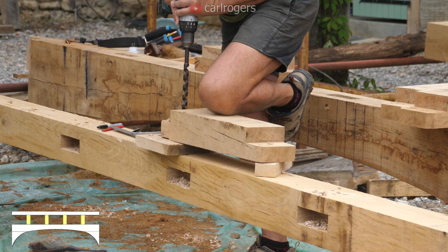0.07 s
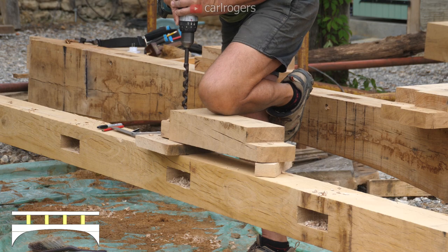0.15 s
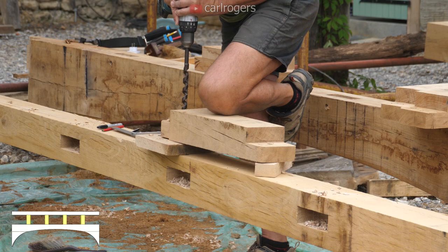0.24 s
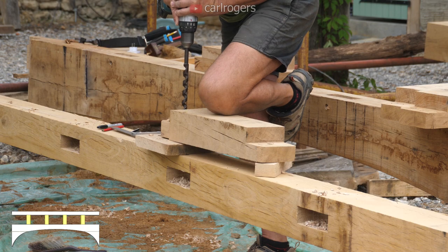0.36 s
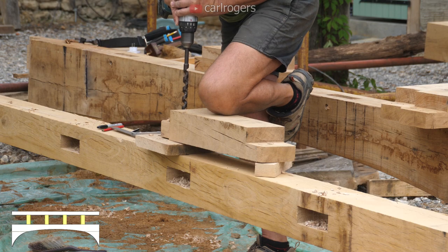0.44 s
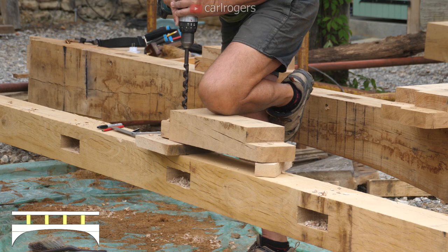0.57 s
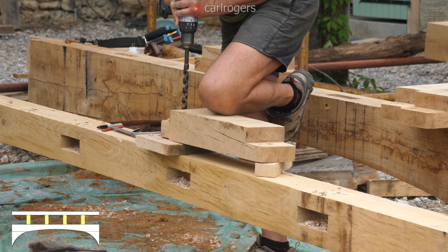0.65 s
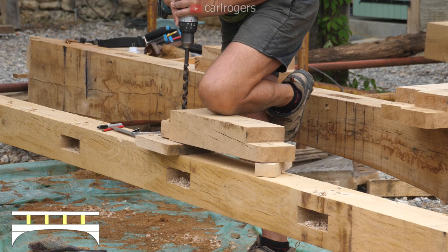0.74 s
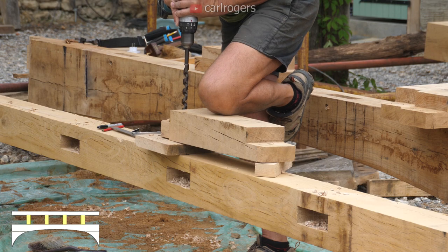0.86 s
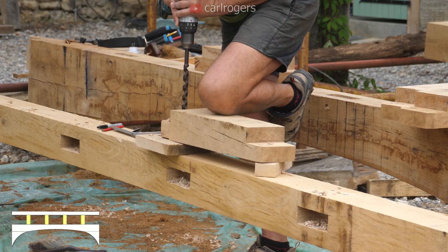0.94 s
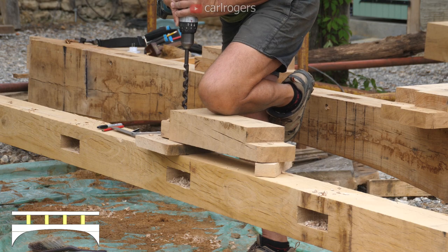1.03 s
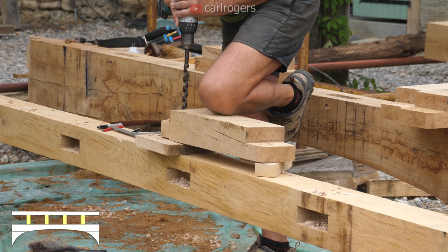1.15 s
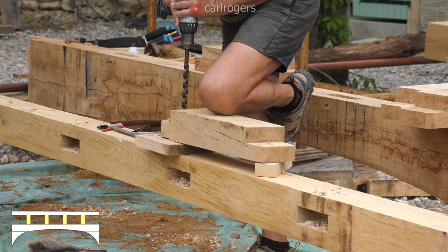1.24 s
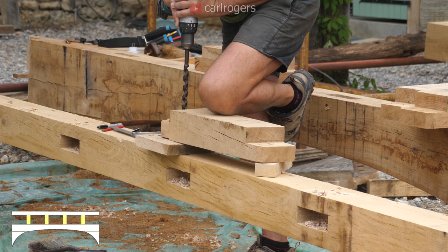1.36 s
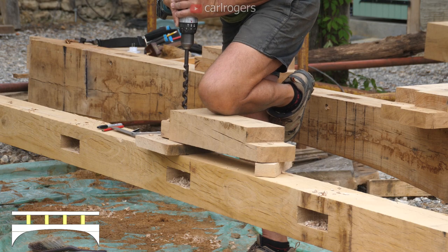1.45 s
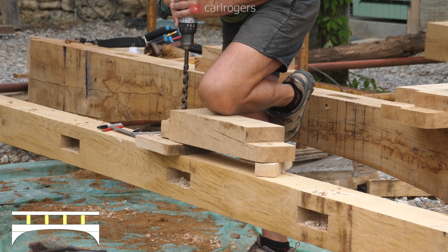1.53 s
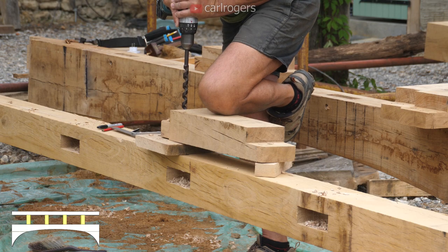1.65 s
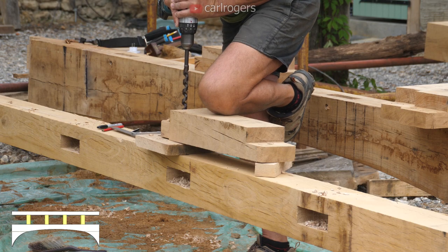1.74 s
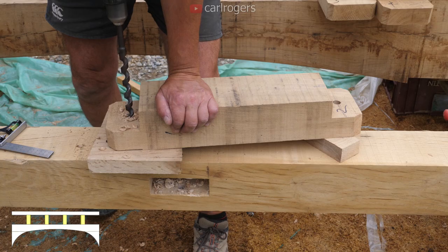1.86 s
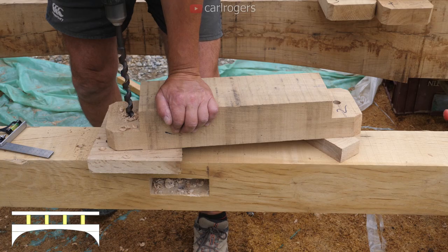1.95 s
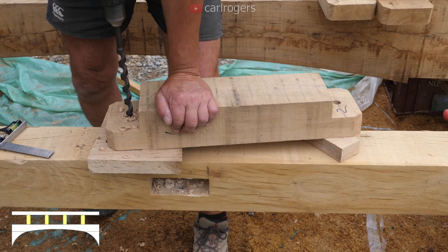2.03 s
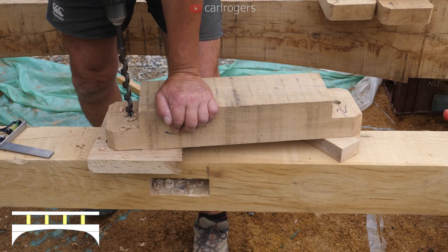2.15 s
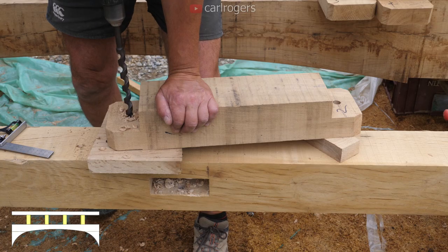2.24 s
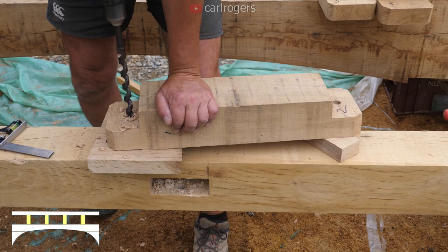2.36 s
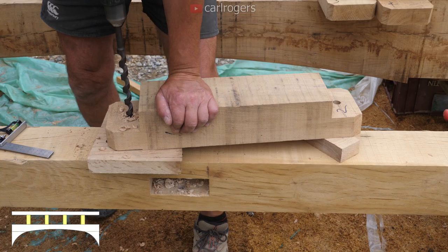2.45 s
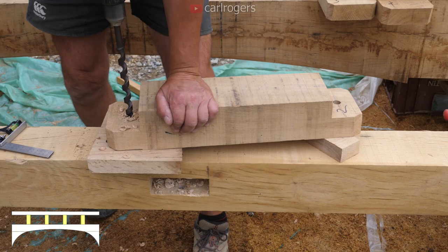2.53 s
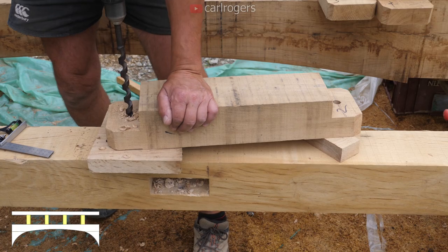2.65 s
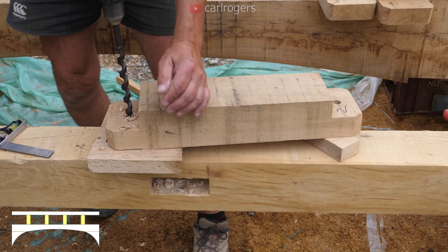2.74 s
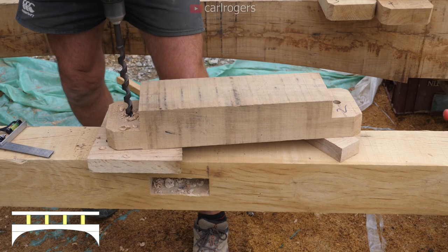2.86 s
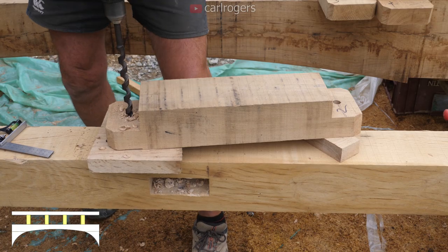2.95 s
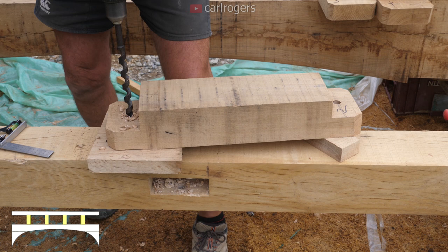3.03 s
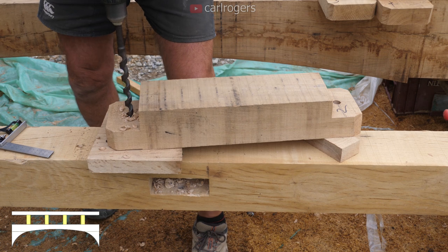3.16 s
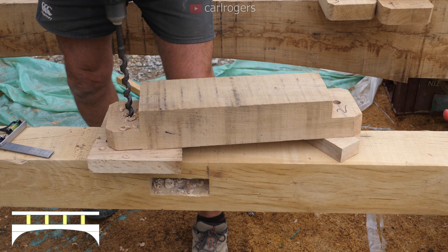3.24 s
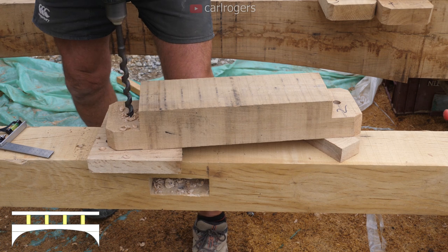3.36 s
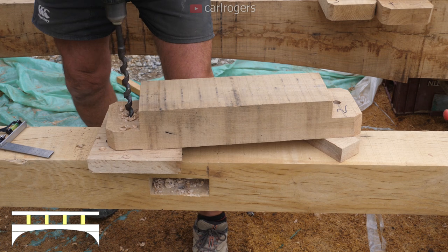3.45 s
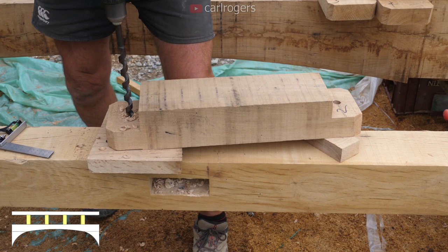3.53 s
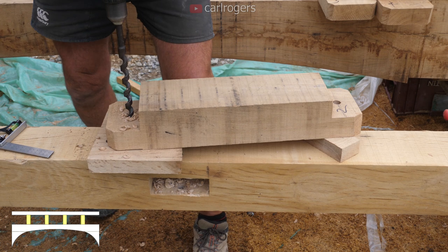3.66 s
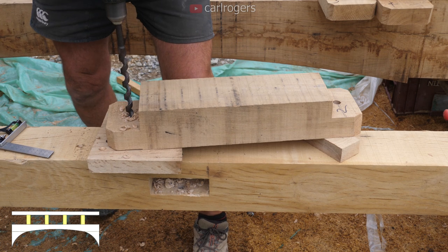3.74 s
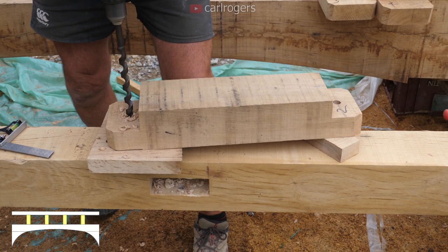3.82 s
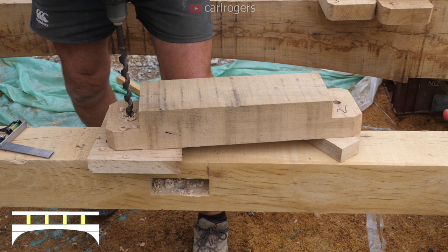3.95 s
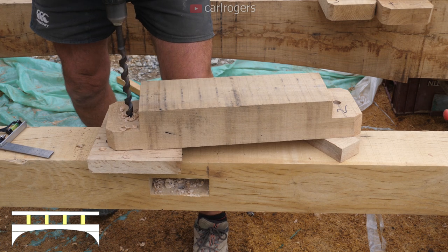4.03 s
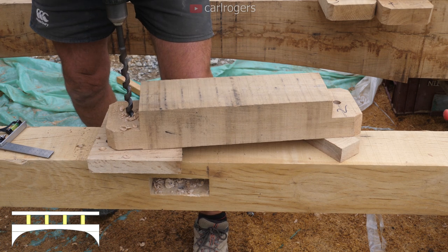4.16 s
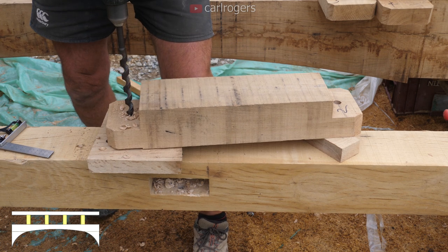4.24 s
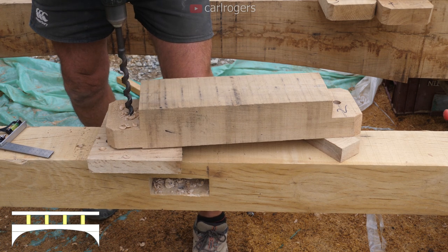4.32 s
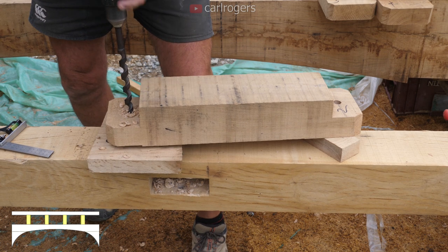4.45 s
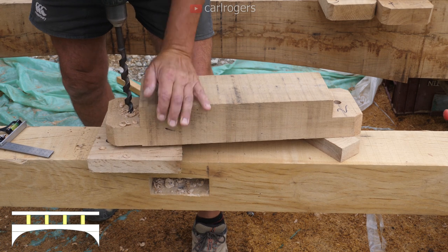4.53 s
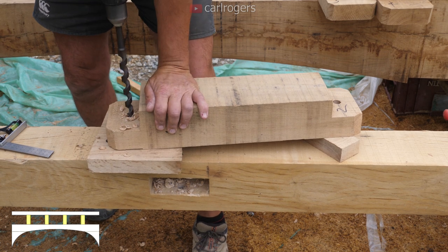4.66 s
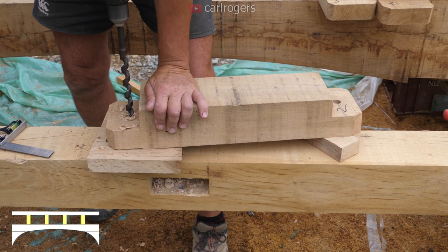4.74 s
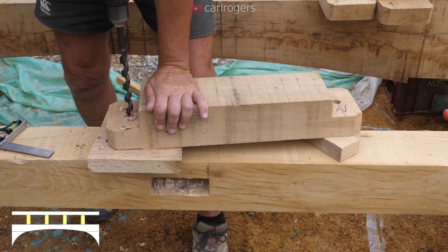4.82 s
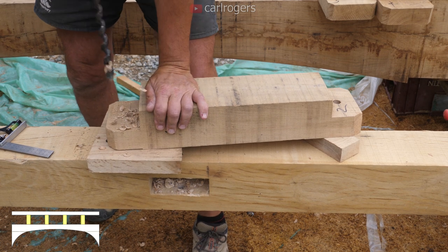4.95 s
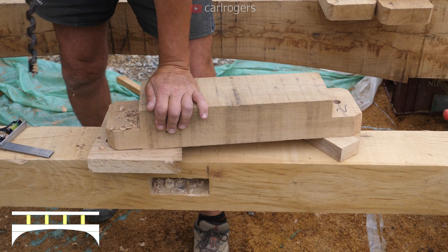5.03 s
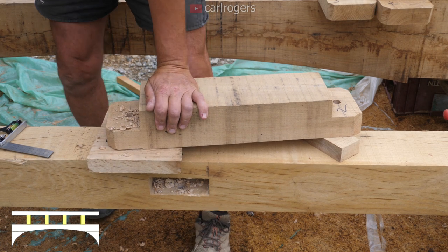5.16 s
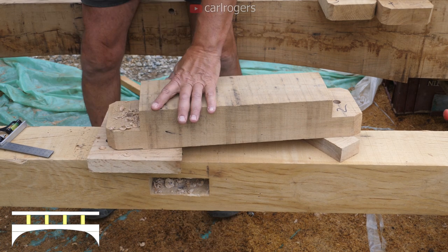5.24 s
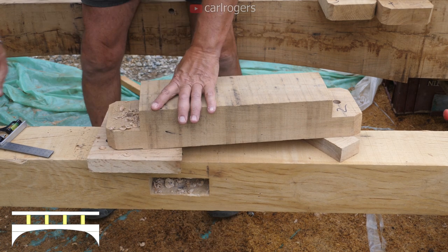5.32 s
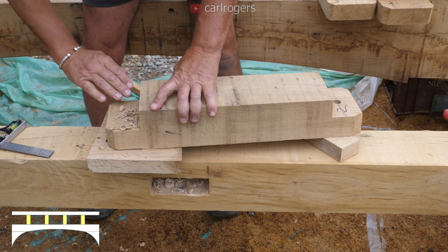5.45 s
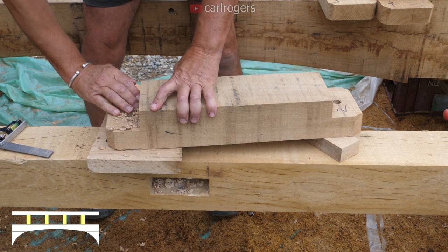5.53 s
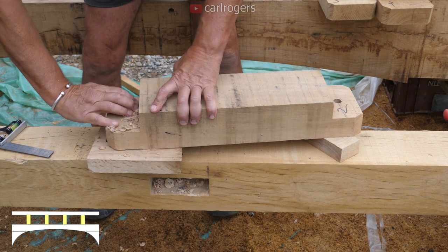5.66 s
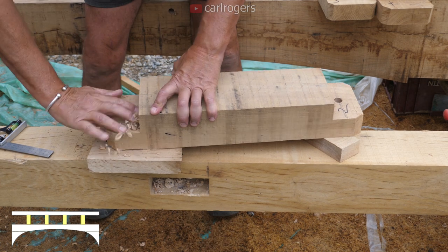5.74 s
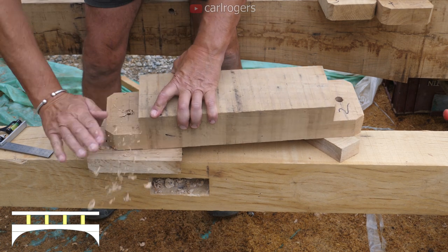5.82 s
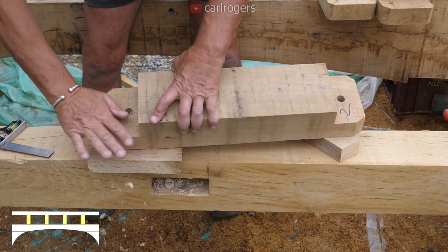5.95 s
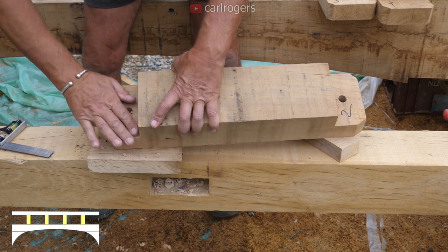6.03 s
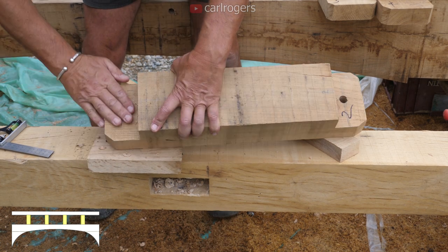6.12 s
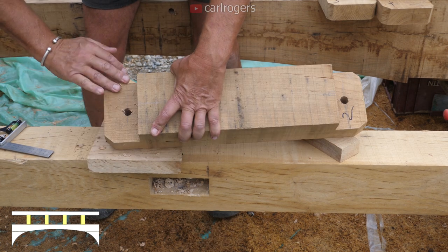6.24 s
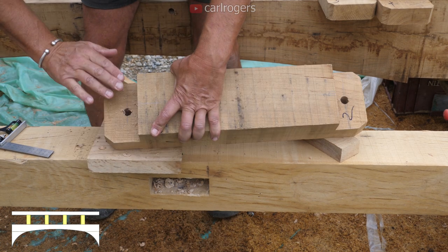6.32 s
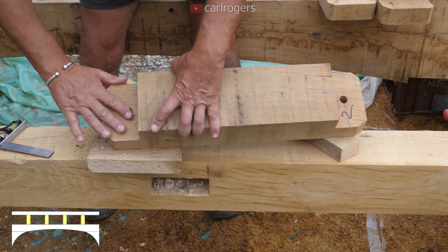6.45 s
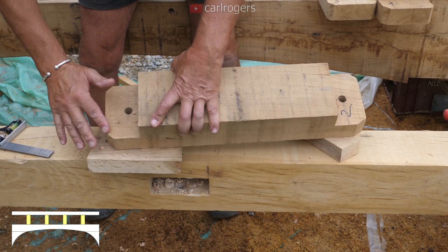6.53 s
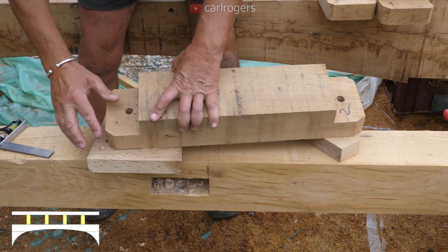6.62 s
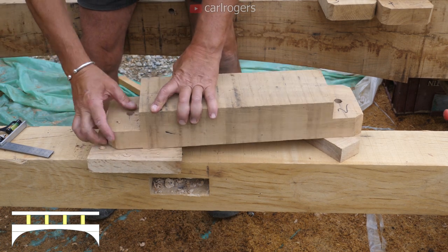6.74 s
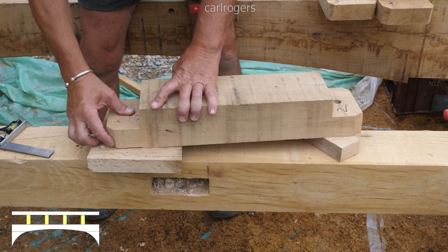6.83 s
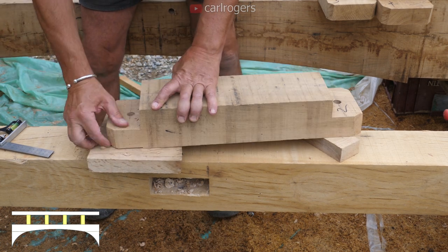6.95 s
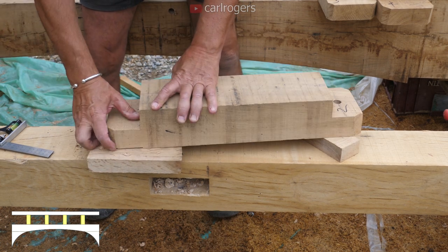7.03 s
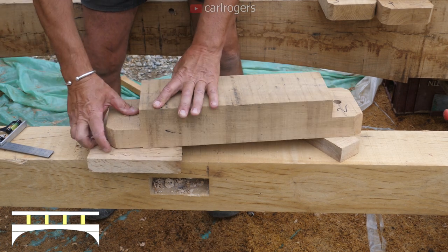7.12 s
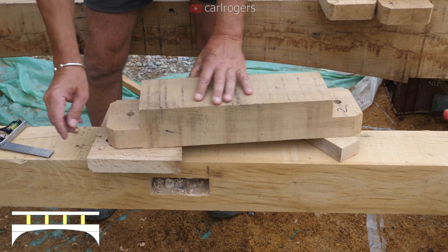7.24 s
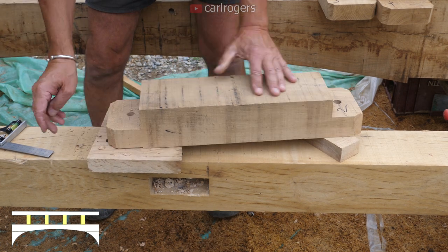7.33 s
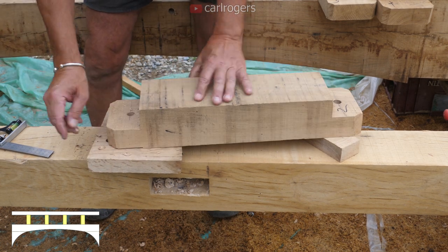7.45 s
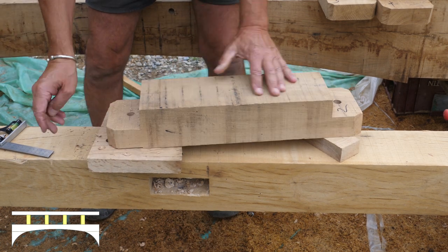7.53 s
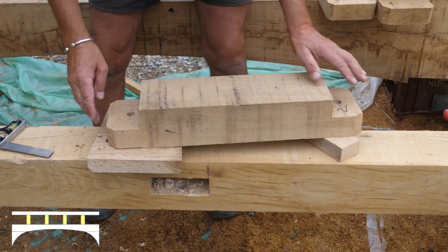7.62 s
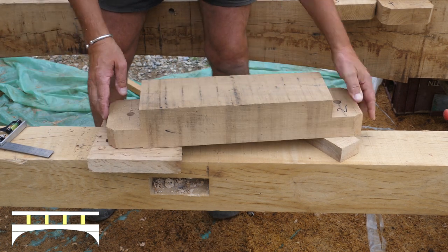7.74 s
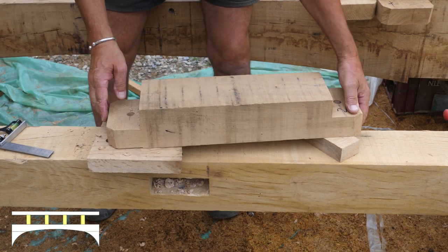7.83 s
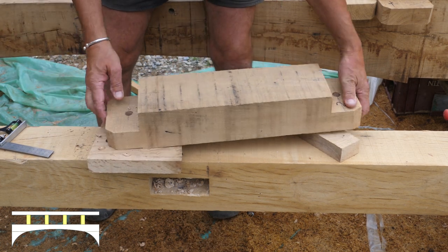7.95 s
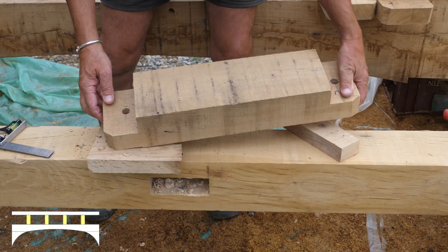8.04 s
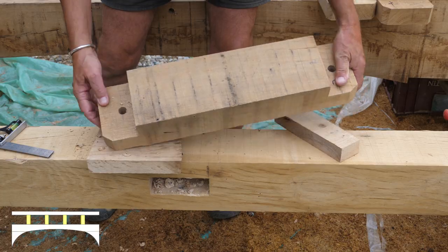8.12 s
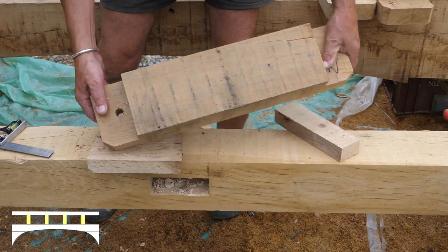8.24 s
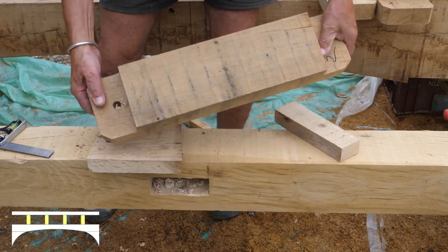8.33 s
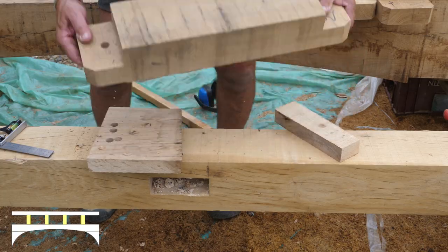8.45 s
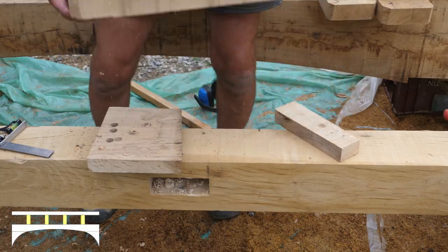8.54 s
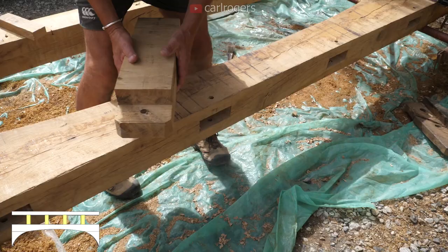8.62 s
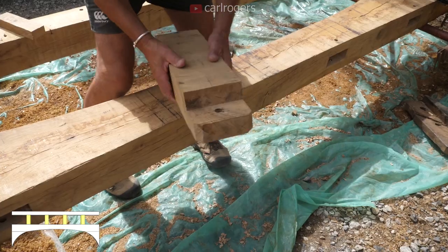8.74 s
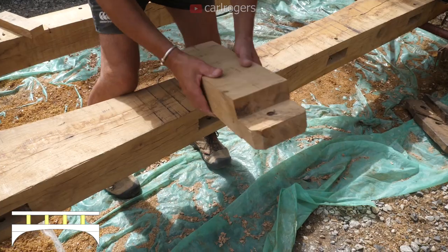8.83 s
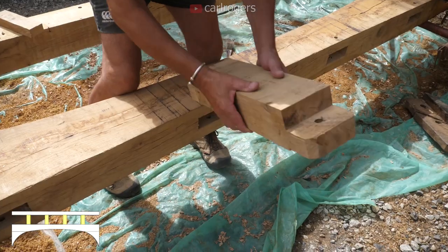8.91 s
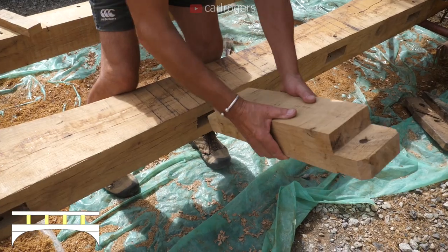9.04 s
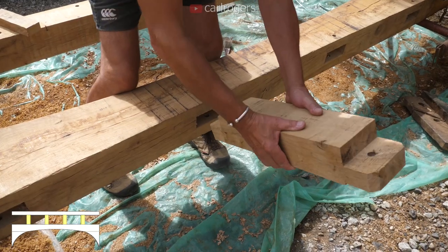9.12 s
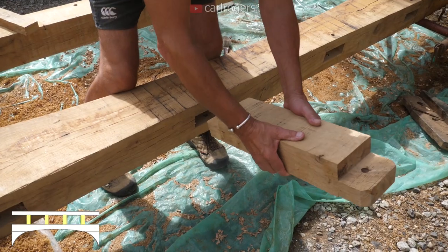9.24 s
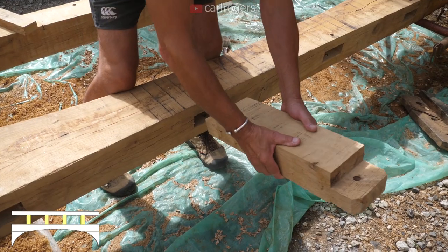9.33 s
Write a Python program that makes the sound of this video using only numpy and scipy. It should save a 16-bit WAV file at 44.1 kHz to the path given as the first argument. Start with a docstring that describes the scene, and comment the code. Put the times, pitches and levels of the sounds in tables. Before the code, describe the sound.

Outdoors, a drill's distant whine jumps nearer for three bursts, followed by rasping wood, gritty brushing, hollow knocks, a short dropout and faint metallic ringing.

```python
"""Outdoors, a cordless drill bores timber: one steady run from further off, then three stabs close by.
Motor and gears whine on multiples of the shaft speed over fan and cutting hiss. Afterwards hands brush
chips away in fine hissing grains, and a wooden block drags in stick-slip bursts, squeaks, and knocks with
ringing modes. A short silence, then more knocks over a faint far ringing of steady metal tones."""
import sys
import numpy as np
from scipy import signal
from scipy.fft import rfft, irfft, next_fast_len
from scipy.io import wavfile
from scipy.ndimage import uniform_filter1d

SR = 44100
rng = np.random.default_rng(int(sys.argv[2]) if len(sys.argv) > 2 else 0)


def put_to_file(sound):
    """Save the sound as 16-bit audio at rate SR, in the file named by the first command-line argument."""
    columns = np.atleast_2d(sound).T  # one column per channel
    safe = np.clip(columns, -1, 1)
    whole_steps = np.round(safe * 32767)
    wavfile.write(sys.argv[1], SR, whole_steps.astype(np.int16))


def level_to_linear(level):
    """Convert decibel levels to linear amplitude factors, elementwise."""
    exponent = np.asarray(level, float) / 20
    return 10 ** exponent


N = 413658
T = np.arange(N) / SR
CLOSE_S = 1.84  # the drill is heard from far before this time, from near after it

# The mute span. Columns: start in seconds, end in seconds.
SILENCE = (8.69, 8.871)
# The span of the near stabs in which the left channel drifts from the right. Columns: start in seconds,
# end in seconds, phase jumps per second, spread of a jump in radians, most that the left is louder in dB.
UNLOCKED = (1.84, 5.34, 9, 1.7, 2.6)


def unit(x):
    """Scale to rms 1."""
    return x / np.sqrt(np.mean(x ** 2))


def colour(x, shape):
    """Filter by (Hz, dB) points joined on a log frequency axis, then scale to rms 1."""
    hz, db = np.transpose(shape)
    size = next_fast_len(N)
    bin_hz = np.arange(size // 2 + 1) * SR / size
    gain = level_to_linear(np.interp(np.log(bin_hz + 1), np.log(hz), db))
    return unit(irfft(rfft(x, size) * gain, size)[..., :N])


def walk(rate):
    """Random levels held 1 / rate s and smoothed twice; rms 1."""
    hold = int(SR / rate)
    steps = np.repeat(rng.standard_normal(N // hold + 1), hold)
    return unit(uniform_filter1d(uniform_filter1d(steps, hold), hold)[:N])


def wide(share):
    """Stereo noise: a common part, and a share of opposite sign left and right."""
    mid, side = rng.standard_normal((2, N))
    return mid + share * side * np.array([[1], [-1]])


def grit(spread_db, density):
    """Sparse clicks, density per second, with a long-tailed spread of sizes."""
    clicks = rng.standard_normal(N) * (rng.random(N) < density / SR)
    return clicks * level_to_linear(spread_db * np.minimum(rng.exponential(size=N), 3.5))


def yard():
    """Far traffic rumble and open-air hiss, both stepping in level; the bass is the same left and right."""
    # Open air. Each row: frequency in Hz, spectral density in dB.
    air_shape = [(18, -85.5), (30, -63.5), (73, -20.5), (111, -4.5), (169, -9), (220, -13.5), (301, -20.5),
                 (344, -26), (382, -18), (424, -20.5), (645, -21.5), (735, -28), (1060, -17.5),
                 (1340, -28.5), (4000, -33.5), (15800, -39.5)]
    # Rumble level in dB: under the far run, the stabs, the handling, and after the silence.
    traffic_db = [-68, -70, -61, -90]
    rumble = colour(rng.standard_normal(N), [(20, -60), (40, -35), (70, -20), (115, -10.5),
                                             (200, -20.5), (300, -30.5), (600, -70)])
    spans = [T < CLOSE_S, T < 5.3, T < SILENCE[0]]
    traffic = level_to_linear(np.select(spans, traffic_db[:3], traffic_db[3])) * rumble
    side_filter = signal.butter(2, 500, "high", fs=SR, output="sos")
    side = signal.sosfilt(side_filter, rng.standard_normal(N))
    air = colour(rng.standard_normal(N) + 0.49 * side * np.array([[1], [-1]]), air_shape)
    air_db = -58 + 2.5 * (T < UNLOCKED[1]) + 1.6 * walk(3.9)
    return level_to_linear(air_db) * air + traffic


def drill(runs, orders, hiss, whine_db, jitter, wobble_db, share, bite):
    """Shaft multiples that waver one by one, hiss pulsed once a shaft turn, and low tearing of the bit."""
    # Shaft speed under load. Each row: time in seconds, turns per second in Hz.
    shaft_speed = [(0, 279.2), (1.835, 277), (1.845, 285.8), (2.1, 285), (2.53, 288.3), (3.27, 289.6),
                   (3.5, 286.4), (3.8, 287.3), (4.15, 283.9), (4.3, 282.4), (4.446, 272), (4.69, 260),
                   (4.765, 277), (4.845, 285), (4.925, 292), (5.056, 297.5)]
    start, stop, db, low_db = np.transpose(runs)[:, :, None]
    # each slope is 20 dB down after its time in seconds, bent by its power
    spin_up = np.maximum((start - T) / 0.036, 0) ** 2.8
    spin_down = np.maximum((T - stop) / 0.027, 0) ** 1.2
    short_db = 20 * (spin_up + spin_down)
    # the bit tears up to 8 dB louder as it starts and stops
    labour_db = 8 * np.exp(-np.maximum(np.minimum(T - start, stop - T), 0) / 0.03)
    # below full level the shaft slows by a share of 0.06 per dB, at most to half speed
    slowing = np.maximum(1 - 0.06 * short_db.min(axis=0), 0.5)
    hz = np.interp(T, *np.transpose(shaft_speed)) * slowing
    # the motor slows a little once per turn of the bit, as its lip meets the grain
    load = 1 - bite * np.cos(2 * np.pi * 4.46 * (T - 0.215)) + jitter * walk(60)
    turn = 2 * np.pi * np.cumsum(hz * load) / SR
    whine = np.zeros(N)
    for k, order_db in enumerate(orders, 1):
        waver_db = min(k / 4, 1) * wobble_db * walk(45)
        whine += level_to_linear(order_db + waver_db) * np.sin(k * turn + 2 * np.pi * rng.random())
    fan = colour(wide(share) * (1 + 0.17 * np.cos(turn)) * level_to_linear(0.6 * walk(20)), hiss)
    tearing = colour(wide(share) + 0.41 * unit(grit(6.9, 2500)),
                     [(150, -26), (320, -18), (480, 0.0), (1000, 0.5), (1500, -22.5)])
    motor = unit(fan + level_to_linear(whine_db) * unit(whine))
    motor_gain = level_to_linear(db - short_db).sum(axis=0)
    tearing_gain = level_to_linear(db - short_db + low_db + labour_db).sum(axis=0)
    return motor_gain * motor + tearing_gain * tearing


def drilling():
    """The far run gives way to three near stabs, each a spinning shaft with its whine, hiss and tearing."""
    # Trigger pulls. Each row: at full speed in seconds, let go in seconds, level in dB,
    # low tearing of the bit in dB against that level.
    runs = [(-1, 3, -28, -19.5), (-1, 2.545, -21, -21.5), (3.198, 4.445, -20, -21),
            (4.678, 5.064, -20, -19)]
    # Whine levels of the far run and of the first, second and last near stab.
    # Each entry: level in dB of shaft multiple 1, 2, 3 ..
    far_orders = [-22, -25, -16, -16, -15, -16, -11, -14, -12, -8, -4, -13, -8, -2, -13, -5, -13, -11, -13,
                  -1.5, -11, -9, -13, -14, -19, -19, -14, -8, -9, -3, -8, -7]
    first_orders = [-20.5, -34.5, -15.5, -11.5, -15.5, -9, -17, -13.5, -14, -4.5, -7, -2.5, -13, -13.5, -12,
                    -0.5, -5.5, -3, -17.5, -4, -13.5, -6.5, -13, -19, -20, -25, -9, -9, -4.5, 1.5, -13.5,
                    -11]
    second_orders = [-16, -27, -20, -24, -14, -5.5, -5, -20, -8, -4.5, -2.5, -8.5, -7.5, -4, -9, -9.5, -1.5,
                     -8.5, -13, -6.5, -10.5, -4, -16.5, -16.5, -18.5, -18, -11.5, -8.5, -11, 1.5, -10, -11]
    last_orders = [-30, -28, -21, -15, -11, -9, -11, -17, -5, -1, -4, -6, -5, -3, -7, -6, -15, -19, -15, -9,
                   -17, -15, -20, -24, -20, -16, -18, -15, -16, -9, -13, -12]
    # Fan and cutting hiss, far and near. Each row: frequency in Hz, spectral density in dB.
    far_hiss = [(530, -16), (900, -33.5), (1240, -3.5), (1760, -11.5), (1940, -4.5), (2380, -9), (3840, -4),
                (4760, -7.5), (5700, -7.5), (7080, -10), (8570, -5.5), (15800, -22.5)]
    near_hiss = [(530, -30), (900, -17), (1620, -3.5), (1740, -2.5), (2350, -5), (2850, -1.5), (4230, -1.5),
                 (5060, -0.5), (6910, -6.5), (8500, 1.5), (14500, -11), (15800, -24)]
    far = drill(runs[:1], far_orders, far_hiss, whine_db=-3.0, jitter=0.0009, wobble_db=2.2,
                share=0.13, bite=0.0095)
    first_stab = drill(runs[1:2], first_orders, near_hiss, whine_db=-2.2, jitter=0.0017, wobble_db=3.0,
                       share=0.04, bite=0.002)
    second_stab = drill(runs[2:3], second_orders, near_hiss, whine_db=-3.5, jitter=0.0024, wobble_db=4.0,
                        share=0.04, bite=0.0029)
    last_stab = drill(runs[3:], last_orders, near_hiss, whine_db=-3.5, jitter=0.003, wobble_db=5.0,
                      share=0.04, bite=0.0028)
    return np.where(T < CLOSE_S, far, first_stab) + second_stab + last_stab


def tones(lines, start, stop, waver_db):
    """Lines of steady pitch whose strength wavers, each rms level in dB before the waver."""
    total = np.zeros(N)
    for hz, db in lines:
        total += np.sqrt(2) * level_to_linear(db + waver_db * walk(30)) * np.sin(2 * np.pi * hz * T)
    return (T > start) * (T < stop) * total


def beam_drone():
    """The beam drones on a few steady pitches under the far run."""
    # Each row: frequency in Hz, level in dB.
    drones = [(156, -60), (224, -53), (352, -62), (1256, -55)]
    return tones(drones, 0, CLOSE_S, 2.8)


def unlock(x):
    """Around the stabs each narrow band's phase holds, then jumps; deep bass stays, mid-range is louder."""
    start, stop, rate, radians, louder_db = UNLOCKED
    hz, s, z = signal.stft(x, SR, nperseg=2048, noverlap=1536)
    bands = (len(hz) // 5 + 1, len(s))  # five bins move together
    inside = (s > start) & (s < stop)
    happens = rng.random(bands) < rate * (s[1] - s[0])
    jumps = radians * rng.standard_normal(bands) * happens * inside
    held = uniform_filter1d(np.cumsum(jumps, axis=1), size=4, axis=1)
    above_bass = np.clip((hz - 150) / 300, 0, 1)[:, None]
    phase = np.repeat(held, 5, axis=0)[:len(hz)] * above_bass * inside
    lean = np.exp(-np.log2(hz / 2600 + 1e-9) ** 2 / 3)[:, None]
    z = z * np.exp(1j * phase) * level_to_linear(louder_db * lean * inside)
    return signal.istft(z, SR, nperseg=2048, noverlap=1536)[1][:N]


def touches(rows):
    """Power of contacts (start s, length s, dB) that fade in, hold and fade out."""
    power = np.zeros(N)
    for s, length, db in rows:
        fade = np.clip(np.minimum(T - s, s + length - T) / 0.012, 0, 1)
        power += level_to_linear(db) ** 2 * fade ** 2
    return power


def hands():
    """The dragged block judders in stick-slip bursts; skin and chips hiss in fine grains."""
    # The block is shoved along the beam. Each row: time in seconds, drag of wood on wood in dB,
    # brushing of chips in dB.
    shove = [(6.045, -80, -80.5), (6.065, -49, -49.5), (6.14, -45.5, -49), (6.18, -26.5, -41.5),
             (6.27, -27.5, -41), (6.3, -33, -49), (6.37, -39, -51), (6.385, -48, -55), (6.455, -52, -59),
             (6.48, -48, -53), (6.54, -56, -44), (6.6, -51.5, -47), (6.65, -54, -59), (6.675, -80, -82)]
    # Strokes of a hand over the wood. Each row: start in seconds, length in seconds, level in dB.
    stroke_rows = [(2.848, .03, -50), (4.47, 0.066, -50), (5.099, .1, -56), (5.222, .036, -52),
                   (5.7, .045, -53), (5.7, .12, -59), (5.797, 0.057, -42.5), (6.737, .024, -60.5),
                   (6.884, .035, -55), (6.937, .043, -53), (7.038, .066, -50), (7.112, 0.562, -51),
                   (7.236, .058, -46), (7.446, .058, -46), (7.729, 0.038, -58), (8.193, .18, -60.5),
                   (8.48, .19, -63.5), (8.978, .11, -56), (9.08, .12, -62), (9.231, .032, -48)]
    # The block slides or turns in the hands. Each row: start in seconds, length in seconds, level in dB.
    slide_rows = [(2.85, 0.029, -53), (6.874, .1, -58), (7.88, .33, -64), (8.855, .25, -53),
                  (9.09, .3, -59), (8.978, 0.133, -48.5)]
    # Tone of the drag, then of the brushing. Each row: frequency in Hz, spectral density in dB.
    drag_shape = [(180, -55), (300, -24), (594, -13), (778, -4.5), (1130, -7), (1420, -5), (1700, -0.5),
                  (4420, -11.5), (7810, -24.5), (9000, -23.5), (11700, -54), (19800, -120)]
    brush_shape = [(880, -24.5), (1500, -11.5), (1660, -4.5), (1960, -9), (2060, -7.5), (2430, -6),
                   (2770, -14.5), (4070, -12), (7000, -12.5), (9900, -5.5), (13600, -11.5), (15900, -18.5)]
    s, drag_db, brush_db = np.transpose(shove)
    strokes, slides = touches(stroke_rows), touches(slide_rows)
    shoving = (T > s[0]) & (T < s[-1])
    # a stroke also drags a little on the wood, and a slide also brushes some chips
    drag_power = shoving * level_to_linear(np.interp(T, s, drag_db)) ** 2 + slides + level_to_linear(-11) ** 2 * strokes
    brush_power = shoving * level_to_linear(np.interp(T, s, brush_db)) ** 2 + strokes + level_to_linear(-9.5) ** 2 * slides
    # each slip dies away over 2 ms
    judder = unit(signal.lfilter([1], [1, -np.exp(-1 / (0.002 * SR))], abs(grit(2.0, 300))))
    drag = colour(wide(0.21) * (0.7 + judder) + 0.8 * unit(grit(4.0, 400)), drag_shape)
    flutter = level_to_linear(2.0 * walk(60)) + 0.35 * judder
    brush = colour(wide(0.25) * flutter + 0.8 * unit(grit(4.8, 1500)), brush_shape)
    return np.sqrt(drag_power) * drag + np.sqrt(brush_power) * brush


def ring(centre_hz, length, ring_db, span=0.68):
    """One blow: a short thud, then the modes near its pitch, each blow striking another spot."""
    # Modes of the block. Each row: frequency in Hz, level in dB, time to fall 60 dB in seconds,
    # all as they stand before the blow's own spread, nearness and length.
    modes_of_wood = [(190, -5, 0.067), (409, -3, 0.17), (547, -7.5, 0.075), (757, -4.5, .1), (887, 1, 0.08),
                     (1093, -8.5, 0.11), (1207, 4.5, 0.033), (1498, -1.5, 0.035), (1660, 2, 0.05),
                     (1800, -7.5, 0.04), (2143, -0.5, 0.042), (2373, 0, 0.024), (2620, -3, .025),
                     (2860, -4, 0.025), (3450, -4, 0.01), (4870, -6, 0.014)]
    t = T[:int(0.3 * SR)] - 0.0022
    hz, db, t60 = np.transpose(modes_of_wood)[:, :, None]
    chance = rng.standard_normal((2,) + hz.shape)
    off = abs(np.log2(hz / centre_hz)) / span
    near = level_to_linear(db + 2.0 * chance[0] - 9 * off ** 2 / (1 + off))
    swing = np.sin(2 * np.pi * hz * (1 + 0.022 * chance[1]) * t)
    decay = np.exp(-np.log(1000) * t / (t60 * length))
    modes = np.sum(near * swing * decay, axis=0) * np.clip(t / 0.0008, 0, 1)
    thud = -np.cos(2 * np.pi * centre_hz * t) * np.exp(-(t * centre_hz / 0.67) ** 2)
    # low-pitched blows also shake the beam underneath
    beam_filter = signal.butter(3, [170, 330], "band", fs=SR, output="sos")
    beam = unit(signal.sosfilt(beam_filter, rng.standard_normal(len(t))))
    beam *= np.exp(-t / 0.04) * (1 - np.exp(-abs(t) / 0.0068)) * (t > 0)
    beam *= level_to_linear(-20 - 20.3 * np.log2(max(centre_hz / 1000, 1)))
    blow = thud + level_to_linear(ring_db) * (modes / np.abs(modes).max() + beam)
    return blow / np.abs(blow).max()


def knocks():
    """Every blow on the block, lower ones ringing longer, with a scattered echo from the timber around."""
    # Each row: start in seconds, peak of the blow in dB, centre of the thud in Hz,
    # ring against the thud in dB.
    blows = [(2.857, -35, 4600, 2), (2.952, -39.5, 1049, 1), (3.17, -30, 520, -4), (4.222, -34, 250, 0),
             (4.679, -27, 300, -6), (5.264, -27, 2370, -15), (5.499, -33, 563, -10), (5.518, -20, 970, -22),
             (6.088, -35.5, 476, 1), (6.131, -17.5, 1650, -1), (6.144, -10.5, 1640, -6.5),
             (6.169, -13, 2300, -8), (6.18, -11.5, 1685, -1), (6.198, -12.5, 1670, -5),
             (6.212, -14, 1500, -6), (6.231, -17, 2600, -12), (6.24, -12, 1860, -8), (6.252, -19, 2200, -6),
             (6.279, -10, 1600, -10), (6.337, -18, 2400, -9), (6.492, -31, 1200, -5),
             (6.513, -33, 1430, -4), (6.532, -20, 11000, -12), (6.573, -25, 6000, -8),
             (6.816, -47, 2200, -10), (6.868, -7.5, 950, -4), (6.981, -34.5, 2050, -4),
             (7.874, -15.5, 1540, -6), (8.005, -30.5, 1600, -3.5), (8.103, -37, 1220, -5),
             (8.142, -31.5, 980, -11), (8.353, -36.5, 420, -3), (8.9, -38, 1500, -4),
             (8.985, -21.5, 1840, -4), (9.032, -32, 2100, 0), (9.057, -31, 1320, 0),
             (9.077, -28.5, 1610, -6), (9.154, -40, 1000, -5), (9.195, -36, 1700, -7),
             (9.208, -33, 1650, -2), (9.239, -39, 1300, -5), (9.249, -39, 2500, -8), (9.317, -33, 1800, -7),
             (9.361, -15.5, 1800, -6)]
    close = np.zeros(N + SR)
    for s, db, hz, ring_db in blows:
        blow = ring(hz, 0.63 * (1000 / hz) ** 0.35, ring_db)
        first = int(s * SR)
        close[first:first + len(blow)] += level_to_linear(db) * blow
    close = signal.sosfilt(signal.butter(2, 150, "high", fs=SR, output="sos"), close)[:N]
    t = T[:int(0.4 * SR)]
    echo = wide(0.5)[:, :len(t)] * np.exp(-np.log(1000) * t / 0.32) * (t > 0.004) * level_to_linear(-40)
    echo = signal.sosfilt(signal.butter(2, 1900, fs=SR, output="sos"), echo)
    scattered = signal.fftconvolve(close[None], echo, axes=1)[:, :N]
    return close * level_to_linear(np.array([[0.6], [-0.6]])) + scattered  # a little to the left


def squeaks():
    """Skin or wood catches and sings, and one blow at 4.67 s carries a low body: short sounds in one narrow,
    trembling band of noise."""
    # Each row: start in seconds, length in seconds, centre in Hz, width in Hz, level in dB.
    rubs = [(4.672, .055, 390, 90, -33), (5.034, .026, 3050, 400, -24), (5.054, .042, 530, 200, -36),
            (5.224, .034, 2300, 1400, -40), (6.888, .03, 3650, 250, -56), (6.942, .025, 2050, 300, -52),
            (7.245, .035, 1320, 200, -56), (7.252, .04, 5200, 200, -56), (7.268, .04, 1660, 90, -51),
            (7.27, .036, 2090, 90, -53), (7.4, .045, 2470, 200, -57), (7.455, .035, 1320, 200, -56),
            (7.462, .04, 5200, 200, -56), (7.478, .04, 1660, 90, -51), (7.48, .036, 2090, 90, -53),
            (7.61, .045, 2470, 200, -58), (8.075, .095, 1760, 60, -61)]
    out = np.zeros(N)
    size = int(0.1 * SR)
    for s, length, hz, width_hz, db in rubs:
        span = slice(int(s * SR), int(s * SR) + size)
        grains = rng.standard_normal(size) * (1 + 1.5 * (rng.random(size) < 0.02))
        edges = [hz - width_hz / 2, hz + width_hz / 2]
        band = signal.sosfilt(signal.butter(2, edges, "band", fs=SR, output="sos"), grains)
        out[span] += np.sqrt(touches([(s, length, db)])[span]) * unit(band)
    return out


def far_ringing():
    """Far metal rings on a few steady, wavering pitches after the silence."""
    # Each row: frequency in Hz, level in dB.
    metal = [(694.4, -61), (1168, -58), (1739, -63.5), (1857, -67)]
    return tones(metal, SILENCE[1], 99, 2.5)


def scene():
    """All sources in the yard, muted across the silence with edges of 2 ms."""
    heard = (T < SILENCE[0]) | (T > SILENCE[1])
    gate = uniform_filter1d(1.0 * heard, size=88)
    boring = yard() + drilling() + beam_drone()
    handling = hands() + knocks() + squeaks()
    return gate * (boring + handling + far_ringing())


def top_cut(x):
    """Nothing passes above the cut-off."""
    return signal.sosfilt(signal.butter(12, 16500, fs=SR, output="sos"), x)


def record(dry):
    """The microphone drops the deepest bass and the very top; the left channel drifts around the stabs."""
    left, right = signal.sosfilt(signal.butter(4, 75, "high", fs=SR, output="sos"), dry)
    top_filter = signal.ellip(8, 0.2, 70, 15900, fs=SR, output="sos")
    both = signal.sosfilt(top_filter, [unlock(left), right])
    return top_cut(both)


dry = scene()
out = record(dry)
put_to_file(out)
```